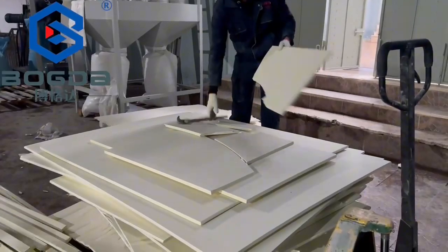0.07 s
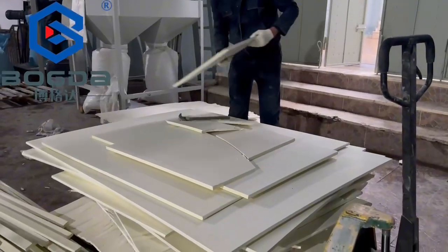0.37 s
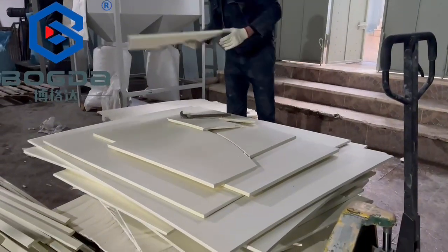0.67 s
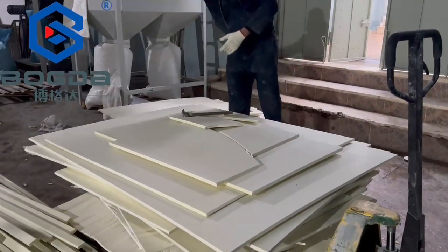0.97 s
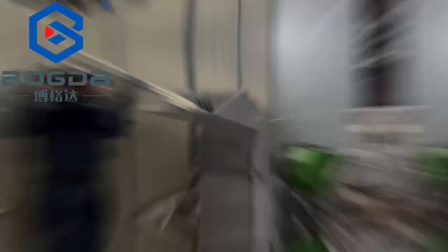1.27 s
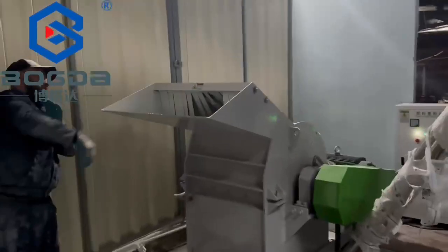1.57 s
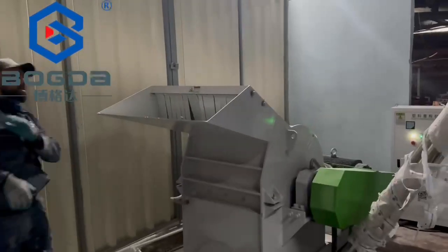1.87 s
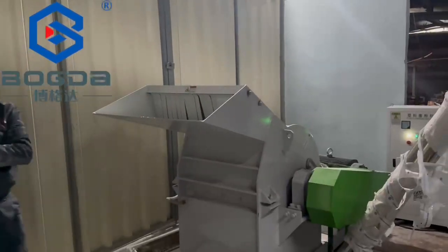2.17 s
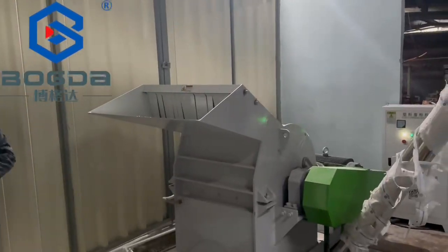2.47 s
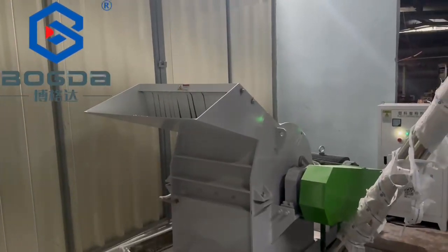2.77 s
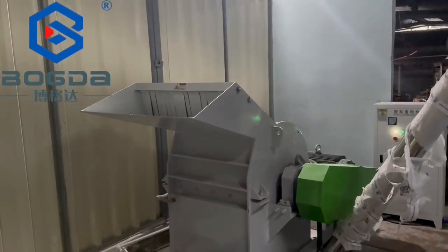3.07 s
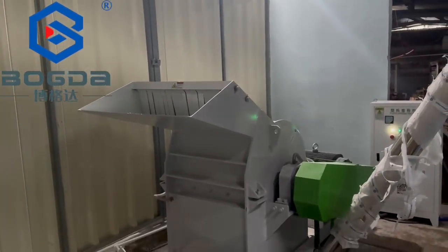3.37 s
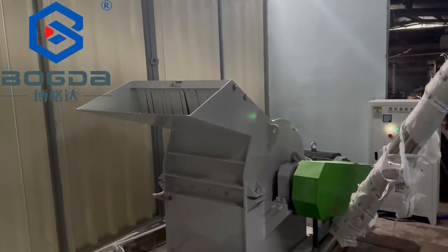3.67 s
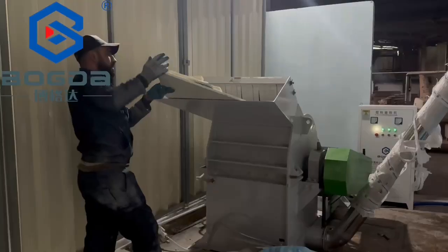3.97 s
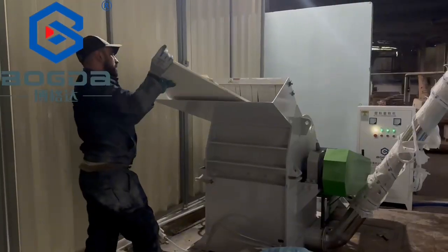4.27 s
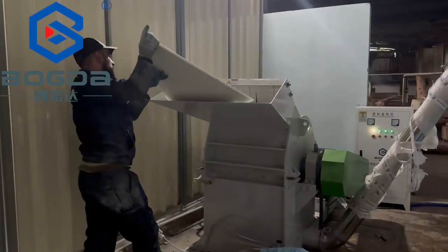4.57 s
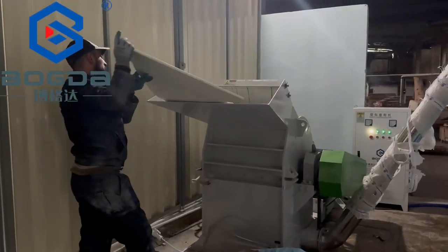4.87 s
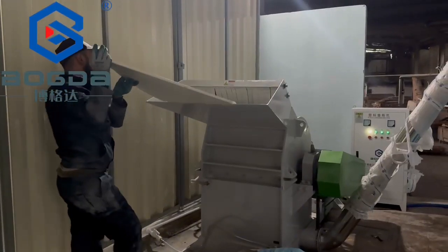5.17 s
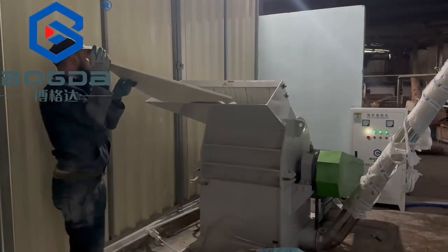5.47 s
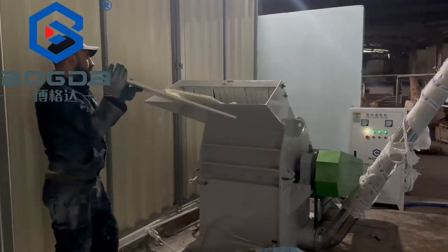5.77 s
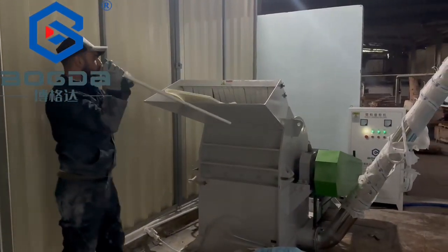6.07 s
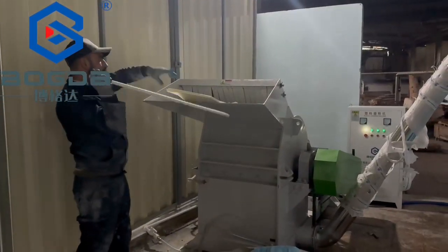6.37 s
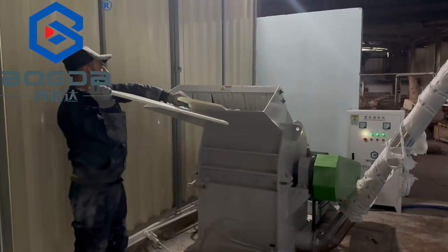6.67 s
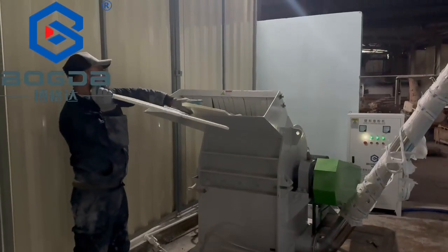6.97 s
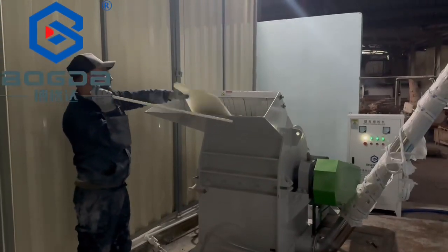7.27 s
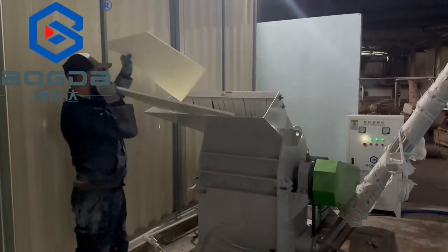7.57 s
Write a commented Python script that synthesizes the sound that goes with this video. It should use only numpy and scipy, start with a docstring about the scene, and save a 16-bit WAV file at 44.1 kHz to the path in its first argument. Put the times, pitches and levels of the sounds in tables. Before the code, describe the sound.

A plastic granulator runs throughout in a workshop: rushing air, rumbling ducts, a humming blower, a whining drive and the low drone of spinning knives. At about 1.3 seconds the listening position jumps to the hopper, where a plastic board is being shredded in a loud burst of cracks, snaps and grinding. It peaks around 1.5 seconds with a brief high squeal, and the machine's pitch sags slightly. The crunching dies away by about 2 seconds as the rotor recovers, and flakes hiss down a pipe, fading gradually. A sharp tick of a chip striking steel comes at 3.1 seconds. At about 3.9 seconds the position shifts beside the feeder: the rush and rumble grow fuller, and a rapidly pulsing metallic scrape and ring joins in. The machine runs on, its tones swelling and fading, until nearly 8 seconds.

```python
"""A workshop with a plastic granulator running, heard by the board stack, facing the hopper, then beside
the feeder. Air rushes, ducts rumble, a conveying blower hums. The drive whines on multiples of the shaft
speed, a part rubs once a turn, and the knives drone as they pump air past the fixed blade. One board is
shredded in a loud burst of cracks that slows the rotor; its flakes hiss away down the pipe."""
import sys
import numpy as np
from scipy import signal
from scipy.fft import rfft, irfft, next_fast_len
from scipy.io import wavfile
from scipy.ndimage import uniform_filter1d

SR = 44100
rng = np.random.default_rng(int(sys.argv[2]) if len(sys.argv) > 2 else 0)


def bounce(signal):
    """Save signal as a 16-bit WAV file at the path given by the first command-line argument."""
    frames = np.transpose(np.atleast_2d(signal))
    limited = np.clip(frames, -1, 1)
    pcm = np.round(limited * 32767).astype(np.int16)
    wavfile.write(sys.argv[1], SR, pcm)


N = 344862
TIME = np.arange(N) / SR
SHAFT_HZ, KNIFE_HZ, BLOWER_HZ = 17.877, 266.98, 49.33
SHRED_HEARD_S = 1.256  # shredding, already under way, is heard suddenly as the scene changes to the hopper
MOVES_S = (1.256, 3.852)  # the scene changes place; per-place triples run stack, hopper, feeder


def from_db(db):
    """Decibels to gain."""
    return 10 ** (np.asarray(db) / 20)


def unit_rms(x):
    """Scale to rms 1."""
    return x / np.sqrt(np.mean(x ** 2) + 1e-20)


def curve(points):
    """Interpolate (t/s, value) rows over the scene."""
    return np.interp(TIME, *np.transpose(points))


def at_hz(spectrum, hz):
    """Read (f/Hz, level/dB) rows on a log-frequency axis."""
    f, db = np.transpose(spectrum)
    return np.interp(np.log(np.maximum(hz, 1)), np.log(f), db)


def coloured(x, spectrum):
    """Filter by a spectrum; rms 1."""
    size = next_fast_len(N)
    hz = np.arange(size // 2 + 1) * SR / size
    return unit_rms(irfft(rfft(x, size) * from_db(at_hz(spectrum, hz)), size)[:N])


def drift(rate_hz):
    """Slow random wander; rms 1."""
    pole = np.exp(-2 * np.pi * rate_hz * 100 / SR)  # one step per 100 samples
    noise = rng.standard_normal(N // 100 + 1002)
    slow = signal.lfilter([1], [1, -2 * pole, pole * pole], noise)[1000:]
    return np.interp(np.arange(N) / 100, np.arange(len(slow)), unit_rms(slow))


def resonance(hz, width_hz):
    """Noise ringing in one narrow band; rms 1."""
    phase = 2 * np.pi * hz * TIME
    return unit_rms(drift(width_hz / 2) * np.cos(phase) + drift(width_hz / 2) * np.sin(phase))


def clicks(per_s, spread_db):
    """Random impulses of uneven size."""
    sizes = from_db(spread_db * np.minimum(rng.exponential(1, N), 4))
    return (rng.random(N) < per_s / SR) * sizes * rng.choice([-1, 1], N)


def swells(rows):
    """Gain of bell-shaped swells from rows of (centre t/s, half-power length/s, level/dB)."""
    t = TIME[::100]
    power = np.zeros(len(t))
    for s, length, db in rows:
        power += from_db(db) ** 2 * .5 ** np.minimum((2 * (t - s) / length) ** 2, 100)
    return np.interp(TIME, t, np.sqrt(power))


def surge(peak_s, db, rise_db_per_s, fall_db_per_s):
    """Gain that climbs to a peak and dies away."""
    return from_db(db - np.maximum(rise_db_per_s * (peak_s - TIME), fall_db_per_s * (TIME - peak_s)))


def places(late_s=0, fade_s=0.0017):
    """Share of each listening place over time."""
    first, second = [np.clip((TIME - s - late_s) / fade_s + .5, 0, 1) for s in MOVES_S]
    return np.array([1 - first, first - second, second])


# Air spectrum at each place: f/Hz, relative level/dB
AIR_STACK = [(25, -40), (45, -16), (100, -10), (150, -6), (230, -4.5), (280, -7), (365, -7.5), (425, -13.5),
             (473, -4), (520, -11), (590, -21.5), (720, -15), (1240, -26.5), (2370, -28.5), (3070, -37),
             (5000, -43), (12500, -53)]
AIR_HOPPER = [(25, -34), (50, -15.5), (100, -8.5), (200, -7), (290, -7.5), (390, -10), (480, -12.5),
              (600, -14), (920, -17.5), (1150, -22.5), (2400, -27.5), (3230, -35.5), (5000, -39.5),
              (12500, -42)]
AIR_FEEDER = [(25, -20), (50, -2), (75, -2), (140, 2.5), (240, 4.5), (310, 4), (390, -2), (480, -1),
              (620, -7.5), (950, -10.5), (1300, -16.5), (2400, -15.5), (3200, -28.5), (5000, -38),
              (12000, -58)]
def air(place, level_db=(-27.5, -27.5, -23.5)):
    """Air rushes through the cutting chamber."""
    return sum(share * from_db(db) * coloured(rng.standard_normal(N), spectrum)
               for share, db, spectrum in zip(place, level_db, (AIR_STACK, AIR_HOPPER, AIR_FEEDER)))


# Air columns of the shorter ducts: f/Hz, width/Hz, relative level/dB
DUCT_MODES = [(146.1, 17.6, -6), (176.5, 4.8, -9.5), (192.3, 11.2, -3), (224.8, 7.2, -9)]
# Swells of rumble and boom: t/s, length/s, gain/dB
RUMBLE_SWELLS = [(.33, 0.13, -27.5), (1.0, 0.19, -24), (1.53, 0.19, -26), (4.2, 0.041, -21),
                 (4.9, 0.26, -25), (6.96, 0.091, -25.5)]
BOOM_SWELLS = [(1.65, 0.074, -31), (2.24, 0.07, -28.5), (2.7, 0.043, -26), (4.09, 0.14, -22.5),
               (4.35, 0.09, -23.5), (5.03, 0.15, -27.5), (5.43, 0.18, -25), (6.29, 0.041, -28),
               (6.88, 0.26, -33), (7.33, 0.15, -27)]
def ducts(place, boom_hz=98.2, boom_db=(-44.5, -37, -35), rumble_db=(-32.5, -33, -27.5)):
    """The longest duct booms in surges, its pitch wandering; the shorter ones rumble."""
    pitch_hz = boom_hz + 2.525 * drift(6.26)
    boom = np.sqrt(2) * np.sin(2 * np.pi * np.cumsum(pitch_hz) / SR)
    rumble = sum(from_db(db) * resonance(hz, width) for hz, width, db in DUCT_MODES)
    boom_gain = np.hypot((from_db(boom_db) @ place) * from_db(3.5 * drift(7.8)), swells(BOOM_SWELLS))
    rumble_gain = np.hypot(from_db(rumble_db) @ place, swells(RUMBLE_SWELLS))
    return boom_gain * boom + rumble_gain * rumble


# Blower tones: multiple of fan speed, level/dB at stack, hopper, feeder
BLOWER_TONES = [(1, -57, -54, -48.5), (6, -34.5, -73, -35.5), (7, -47, -25.5, -37.5)]
# Swells of one tone: t/s, length/s, level/dB
HUM_SWELLS = [(2.12, 0.087, -25.5), (2.85, .4, -33), (3.65, 0.56, -34), (5.78, 0.074, -25),
              (6.2, 0.27, -31.5), (6.48, 0.064, -25.5), (7.2, 1, -35.5)]
def blower(place, load, cut, max_sag=0.0117, flutter_rad=.17, swelling_multiple=7):
    """The fan hums on multiples of its speed; the hum slows during cutting, flutters under rotor load."""
    fan_time = TIME - np.cumsum(max_sag * cut / cut.max()) / SR
    phase = 2 * np.pi * BLOWER_HZ * fan_time + 0.02 * drift(0.41) + flutter_rad * load * drift(16)
    waver_db = np.array([1.2, .5, 2.0]) @ place
    hum = 0
    for k, *place_db in BLOWER_TONES:
        level = (from_db(place_db) @ place) * from_db(waver_db * drift(1.1))
        if k == swelling_multiple:
            level = np.hypot(level, swells(HUM_SWELLS))
        hum += level * np.sqrt(2) * np.sin(k * phase + 2 * np.pi * rng.random())
    return hum


# Panel tones: shaft multiple, level/dB at stack, hopper, feeder
PANEL_TONES = [(25, -56, -44, -45), (39, -48, -42.5, -45), (52, -59, -44, -42.5), (65, -62, -47, -51),
               (223, -66, -70, -66)]
# Their swells: shaft multiple, t/s, length/s, level/dB
PANEL_SWELLS = [(39, 3, 0.64, -38), (39, 4.9, 0.85, -37), (52, 2.51, 0.39, -36.5), (52, 4.7, 0.5, -37.5),
                (52, 5.98, 0.17, -37), (52, 6.62, 0.12, -38), (52, 7.02, 0.58, -32), (52, 8, 0.55, -36.5),
                (223, 4.2, 0.53, -52), (223, 4.67, 0.22, -53), (223, 5.22, 0.5, -53)]
def panels(turns, place, waver_db=1.0):
    """Shaft multiples that meet a panel resonance sing out as clean tones, louder in spells."""
    out = 0
    for k, *place_db in PANEL_TONES:
        spells = swells([row[1:] for row in PANEL_SWELLS if row[0] == k])
        level = np.hypot(from_db(place_db) @ place, spells) * from_db(waver_db * drift(8))
        out += level * np.sqrt(2) * np.sin(2 * np.pi * k * turns)
    return out


# Drive tones: shaft multiple, relative level/dB
DRIVE_TONES = [(26, -38), (38, -41), (40, -39.5), (49, -53), (51, -41), (53, -37.5), (55, -41.5), (57, -59),
               (78, -44), (90, -45.5), (91, -43), (104, -42.5), (105, -44), (112, -51), (116, -44.5),
               (117, -46.5), (118, -39.5), (121, -54), (129, -45.5), (130, -42.5), (131, -48), (132, -42.5),
               (134, -45), (141, -46.5), (142, -44), (167, -51), (168, -50), (219, -68)]
# Weaker multiples between them: f/Hz, relative level/dB
DRIVE_BUZZ = [(350, -44), (900, -53), (1300, -58), (1800, -64.5), (2200, -57), (2500, -61), (2750, -60),
              (3300, -77), (4200, -78)]
def drive(turns, from_multiple, to_multiple, fade=0.42, size=8192):
    """A whine repeats every turn; changing paths through the hall swell and fade each tone; rms 1."""
    multiples = np.arange(size // 2 + 1)
    level = from_db(at_hz(DRIVE_BUZZ, multiples * SHAFT_HZ) + rng.normal(0, 4.3, len(multiples)))
    level *= ~np.isin(multiples, [row[0] for row in PANEL_TONES])
    for k, db in DRIVE_TONES:
        level[k] = from_db(db)
    level *= (multiples >= from_multiple) & (multiples < to_multiple)
    out = 0
    for path_gain in (1, fade * drift(1.2), fade * drift(6.0)):
        one_turn = irfft(level * np.exp(2j * np.pi * rng.random(len(multiples))), size)
        out += path_gain * np.interp(turns % 1 * size, np.arange(size), one_turn)
    return unit_rms(out)


# Once-a-turn throb of pressure: t/s, depth/dB
RUB_THROB = [(2, 10), (4, 2.5), (5.5, 6), (7.2, 8.5)]
# Ring swells, feeder only: shaft multiple (played rounded), t/s, length/s, level/dB
RUB_RINGS = [(104, 4.9, 0.68, -46.5), (104, 6.1, 0.68, -50), (105.4, 6.65, 0.34, -51),
             (115.1, 3.9, .2, -44), (115.7, 3.7, .35, -45), (117, 4.8, .6, -38), (115.6, 7.7, .7, -41.5),
             (124.2, 3.85, .2, -43), (116.3, 4.35, .5, -40), (115.9, 7, 0.79, -47),
             (122.6, 4.22, 0.31, -38.5), (120.3, 4.9, .5, -41), (121.7, 6.2, 0.82, -45),
             (123, 3.9, 0.28, -43), (126, 7.2, 1.5, -48), (128.6, 7.42, 0.57, -41.5),
             (128.6, 4.76, 0.38, -36), (130.5, 7.6, 0.52, -47), (130, 4.4, 1.1, -46),
             (136.4, 6.06, .3, -41.5), (131, 4.2, .3, -45), (132, 5.8, 1.3, -49.5), (133, 5.55, 0.36, -43),
             (133.6, 4.25, 0.35, -39), (146, 4.16, 0.27, -43), (140.7, 5.25, 0.82, -44.5),
             (141.5, 8, .5, -49)]
# Scrape swells, feeder only: t/s, length/s, level/dB
SCRAPE_SWELLS = [(3.9, 0.49, -35.5), (4.65, 0.72, -39.5), (6.05, 1, -42), (7.5, 0.56, -68)]
# Friction noise: f/Hz, relative level/dB
SCRAPE_SPECTRUM = [(700, -19), (1200, -3), (1800, -10), (2150, -1), (2550, -10), (2900, -21), (4000, -23),
                   (6000, -44)]
def rub(turns, place, scrape_db=(-50, -56, -41), throb_peak_s=7.115, uneven_db=4.0, stray_rad=0.98):
    """A part rubs hardest at one shaft angle; it scrapes and rings on shaft multiples near 2.2 kHz."""
    at_feeder = place[2]
    angle = 2 * np.pi * (turns - np.interp(throb_peak_s, TIME, turns))
    pressure = from_db(curve(RUB_THROB) * np.cos(angle) + uneven_db * drift(1.6))
    pressure /= np.sqrt(uniform_filter1d(pressure ** 2, size=16384))
    ring = 0
    for k in sorted({round(row[0]) for row in RUB_RINGS}):
        level = swells([row[1:] for row in RUB_RINGS if round(row[0]) == k])
        ring += level * np.sqrt(2) * np.cos(k * angle + stray_rad * drift(0.76))
    scrape_gain = np.hypot(from_db(scrape_db) @ place, at_feeder * swells(SCRAPE_SWELLS))
    scrape = scrape_gain * coloured(rng.standard_normal(N), SCRAPE_SPECTRUM)
    return np.sqrt(pressure) * (at_feeder * ring + scrape)


# Drone fundamental: t/s, level/dB before gain_db
DRONE_LEVEL = [(0.05, -27.5), (1.38, -28.5), (1.44, -22), (1.87, -25.5), (1.91, -31.5), (2.09, -23),
               (2.13, -29), (2.43, -24), (2.51, -33), (2.73, -24.5), (2.82, -28), (2.92, -23.5),
               (3.46, -24), (3.52, -29), (3.65, -23.5), (3.82, -29), (3.84, -35.5), (4.23, -21.5),
               (4.51, -29.5), (4.64, -21.5), (4.94, -29), (4.98, -21), (5.02, -33), (5.15, -23),
               (5.37, -26), (7.75, -20)]
# Overtones: multiple of the knife rate, level/dB at feeder
KNIFE_OVERTONES = [(2, -35.5), (3, -41.5), (4, -48), (5, -48)]
def knives(rotor_time, place, gain_db=0.45, beam_db=(-12, -11, 0), waver_db=1.0):
    """Knives passing the fixed blade pump the air; the overtones beam towards the feeder."""
    phase = 2 * np.pi * KNIFE_HZ * rotor_time + 0.099 * drift(2.9)
    drone = from_db(gain_db + curve(DRONE_LEVEL)) * np.sin(phase)
    overtones = sum(from_db(db - waver_db * drift(22.0)) * np.sin(k * phase) for k, db in KNIFE_OVERTONES)
    return np.sqrt(2) * (drone + (from_db(beam_db) @ place) * overtones)


# Flake hiss: f/Hz, relative level/dB
FLAKE_SPECTRUM = [(2500, 6), (4000, 5.5), (5200, -1.5), (6800, 7), (8200, -2), (11000, 5.5), (12200, 2.5),
                  (13000, -16)]
def flakes(place, flush, trickle_db=(-50, -48, -43), flush_db=-33.5, clump_db=1.3):
    """Flakes tick along the pipe wall in loose clumps: a steady trickle, and a flush after the board."""
    flow = np.hypot(from_db(trickle_db) @ place, from_db(flush_db) * flush)
    clumps = from_db(clump_db * drift(9.6))
    return flow * clumps * coloured(clicks(12000, 2.9), FLAKE_SPECTRUM)


# Short cracks: t/s, level/dB, decay/s
CRACKS = [(1.2555, -19, 0.005), (1.493, -19, 0.004), (3.1012, -19.5, 0.0025), (3.106, -34, 0.04),
          (3.1145, -28, 0.002)]
# Their spectrum: f/Hz, relative level/dB
CRACK_SPECTRUM = [(400, -14), (900, -4), (1500, 2), (2400, -1.5), (3500, -8), (4500, -13), (7500, -12),
                  (9000, -16), (12500, -25)]
def cracks():
    """Short cracks: a sharp edge as the shredding comes into hearing, then chips striking steel."""
    envelope = sum(from_db(db) * (TIME >= s) * np.exp(-np.abs(TIME - s) / decay)
                   for s, db, decay in CRACKS)
    return envelope * coloured(rng.standard_normal(N), CRACK_SPECTRUM)


# Breaks: t/s, level/dB, f/Hz
SNAPS = [(1.3402, -23, 2140), (1.3596, -16, 1950), (1.483, -13, 2030), (1.541, -18, 1350),
         (1.659, -16, 1510), (1.7606, -24, 1870), (1.799, -24, 2300), (1.9278, -26, 2150),
         (2.034, -31, 1990)]
# Plate modes: ratio to f, relative level/dB
PLATE_MODES = [(.56, -5), (1, -3.5), (1.63, -7), (2.5, -14)]
def snaps(decay_s=.007, size=4096):
    """Large pieces break off the board and ring briefly in their plate modes."""
    out, age = np.zeros(N), np.arange(size) / SR
    for s, db, hz in SNAPS:
        start = int(s * SR)
        ring = sum(from_db(mode_db) * np.sin(2 * np.pi * hz * ratio * rng.uniform(0.95, 1.03) * age)
                   for ratio, mode_db in PLATE_MODES)
        out[start:start + size] += from_db(db) * ring * np.exp(-age / decay_s)
    return out


def shards(count=220, low_hz=560, high_hz=5140, decay_s=0.006, size=2048):
    """Shards snap off for a second from SHRED_HEARD_S, each ringing at three pitches; rms 1 meanwhile."""
    out, age = np.zeros(N), np.arange(size) / SR
    for delay_s in rng.random(count):
        start = int((SHRED_HEARD_S + delay_s) * SR)
        hz = low_hz * (high_hz / low_hz) ** rng.random(3)
        ring = np.sin(2 * np.pi * np.outer(age, hz)).sum(axis=1)
        out[start:start + size] += ring * np.exp(-age / decay_s)
    return out / np.sqrt(np.sum(out ** 2) / SR)


# Knife bites: t/s, cutting level/dB, splintering level/dB
BITES = [(1.285, -31.5, -31.5), (1.453, -18.5, -21.5), (1.567, -17.5, -17.5), (1.815, -26, -26),
         (1.99, -40, -38.5), (2.3, -46, -44)]
def biting():
    """Gains of cutting and splintering, heard from SHRED_HEARD_S on: each bite builds and dies away."""
    heard = np.clip((TIME - SHRED_HEARD_S) / .003 + .5, 0, 1)
    cut_power = sum(surge(s, db, 76, 55) ** 2 for s, db, _ in BITES)
    splinter_power = sum(surge(s, db, 100, 92) ** 2 for s, _, db in BITES)
    return heard * np.sqrt(cut_power), heard * np.sqrt(splinter_power)


# Edge squeals: t/s, length/s, level/dB, f/Hz
SQUEALS = [(1.582, 0.1, -29, 6780), (1.593, 0.05, -30, 5950)]
def squeals(width_hz=180):
    """The board's edge squeals briefly on the steel."""
    return sum(swells([(s, length, db)]) * resonance(hz, width_hz) for s, length, db, hz in SQUEALS)


# Steel chamber modes: f/Hz, width/Hz, level/dB re cutting
CHAMBER_MODES = [(520, 84, -19), (910, 66, -18), (1286, 110, -18), (1990, 130, -18), (3770, 280, -18)]
# Cutting and splintering spectra: f/Hz, relative level/dB
CUT_SPECTRUM = [(30, -24), (90, -2), (200, 6), (450, 4), (800, -2), (1400, -3.5), (2100, -2), (3200, -6),
                (4500, -13), (8000, -46)]
SPLINTER_SPECTRUM = [(2200, 6), (3200, -4), (3700, -12), (4600, 5), (6000, 6.5), (8000, 2), (10000, -2),
                     (12200, 6), (12800, -41)]
def shredding(turns, cut, splinter, chop_db=0.4, roar_db=-1.3, shard_db=-4.5):
    """Knife strokes crack the board so densely that it roars and rings the chamber; shards crackle."""
    strokes = from_db(-chop_db * (np.sin(4 * np.pi * turns) + 0.42 * drift(46)))
    chamber = sum(from_db(db) * resonance(hz, width) for hz, width, db in CHAMBER_MODES)
    roar = from_db(roar_db) * coloured(strokes * clicks(5000, 1.7), CUT_SPECTRUM)
    cutting = cut * (roar + strokes * chamber + from_db(shard_db) * shards())
    splinters = splinter * coloured(strokes * clicks(16000, 3.1), SPLINTER_SPECTRUM)
    return cutting + splinters


# Rotor under load: t/s, share of speed lost
ROTOR_SAG = [(0, 0), (1.33, 0), (1.5, .02), (1.68, .024), (1.85, .01), (2.05, .003), (3.8, .002), (3.9, 0),
             (7.82, 0)]
def scene(whine_db=(-40, -38, -33), shrill_db=(-42, -40, -38.5), choke_db=8.5):
    """Under load the rotor slows and the idle sounds dip; the flush of flakes muffles the fan."""
    sag, place = curve(ROTOR_SAG), places()
    rotor_time = np.cumsum(1 - sag) / SR
    turns = SHAFT_HZ * rotor_time
    cut, splinter = biting()
    flush = surge(peak_s=1.49, db=0, rise_db_per_s=73, fall_db_per_s=6.5)
    hum = from_db(-choke_db * flush) * blower(place, sag / sag.max(), cut)
    whine = (from_db(whine_db) @ place) * drive(turns, 20, 100)
    shrill = (from_db(shrill_db) @ place) * drive(turns, 100, 240)
    idle = from_db(-160 * sag) * (panels(turns, place) + rub(turns, place) + air(place))
    drone = knives(rotor_time, place)
    rumble = ducts(places(late_s=0.09, fade_s=0.06))
    board = shredding(turns, cut, splinter) + squeals() + snaps() + cracks()
    return (rumble + hum + idle + whine + shrill + drone + flakes(place, flush) + board)[None]


def record(dry, cutoff_hz=12900):
    """Steep low-pass."""
    return signal.sosfilt(signal.ellip(12, .1, 100, cutoff_hz, fs=SR, output="sos"), dry)


dry = scene()
out = record(dry)
bounce(out)
```